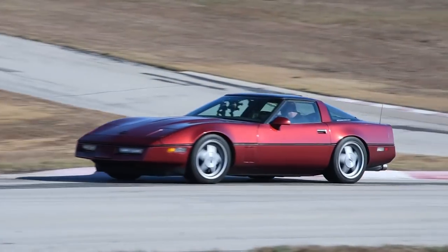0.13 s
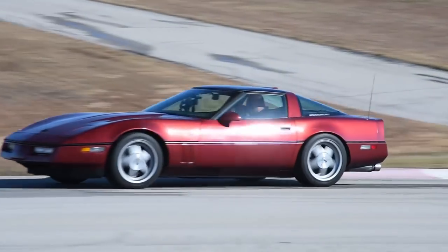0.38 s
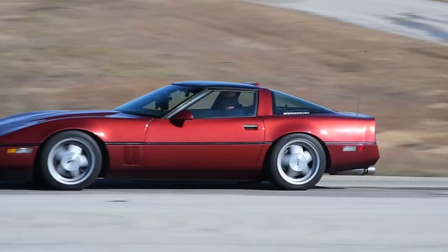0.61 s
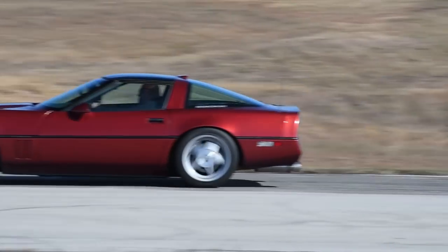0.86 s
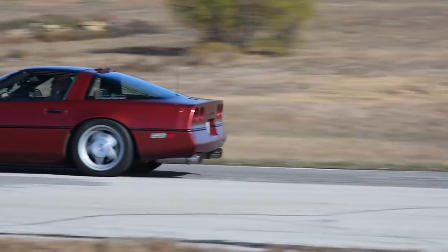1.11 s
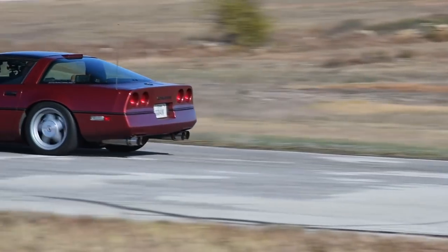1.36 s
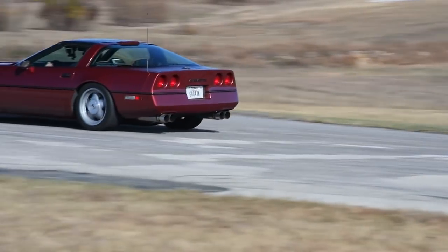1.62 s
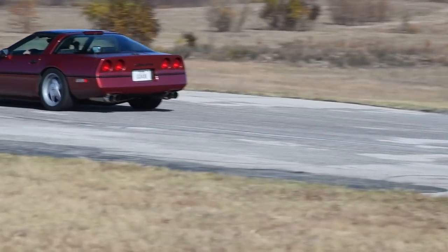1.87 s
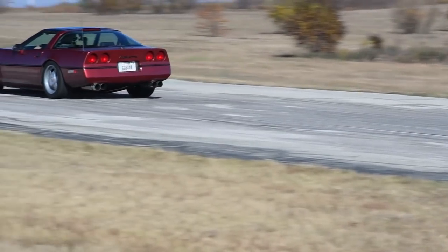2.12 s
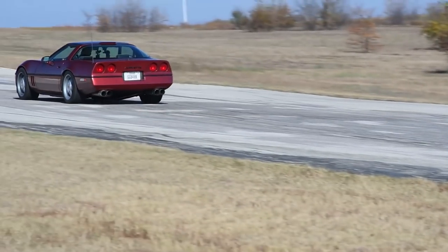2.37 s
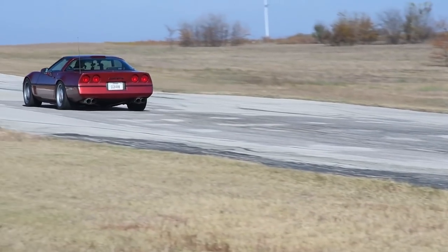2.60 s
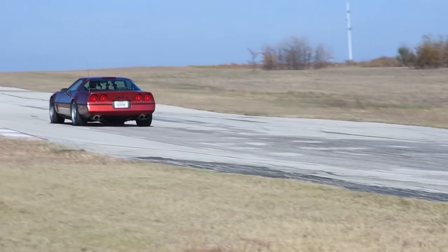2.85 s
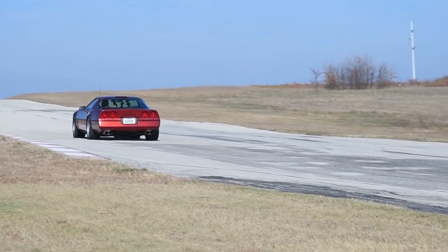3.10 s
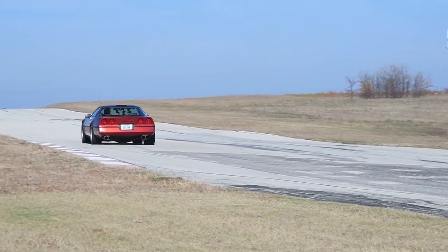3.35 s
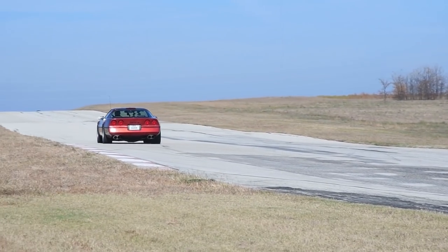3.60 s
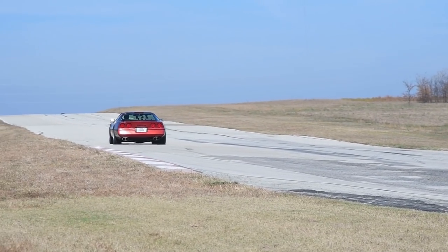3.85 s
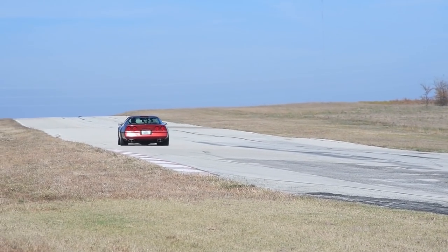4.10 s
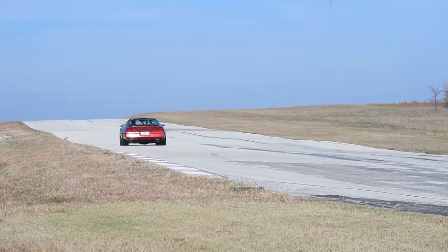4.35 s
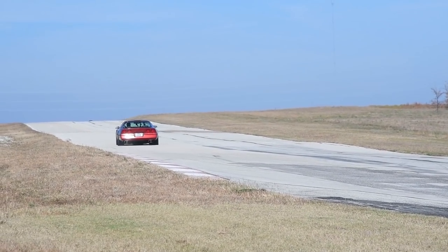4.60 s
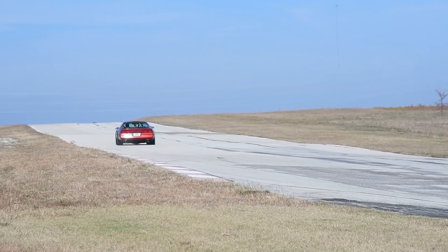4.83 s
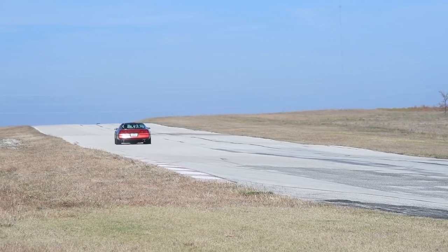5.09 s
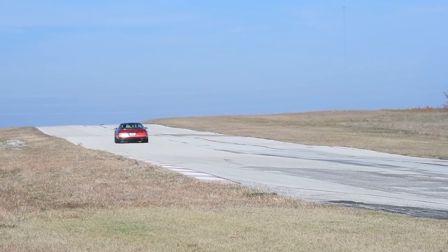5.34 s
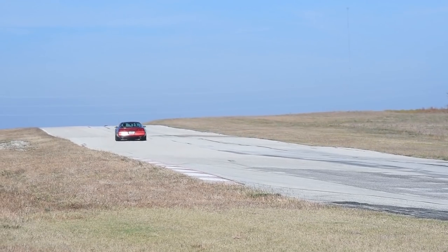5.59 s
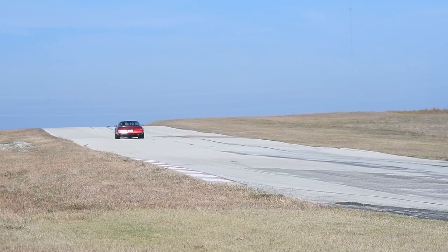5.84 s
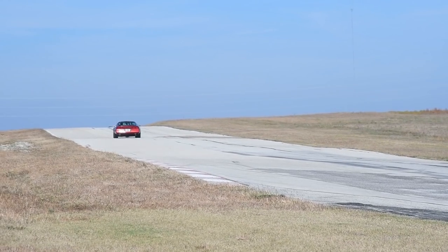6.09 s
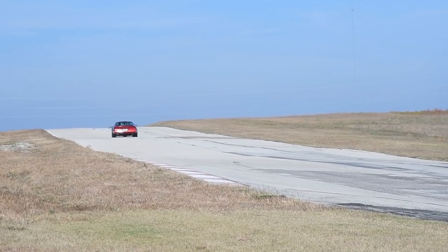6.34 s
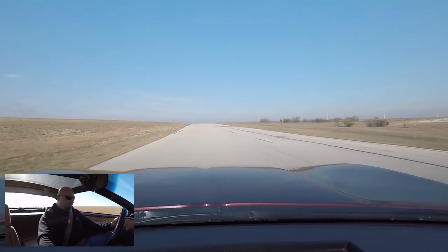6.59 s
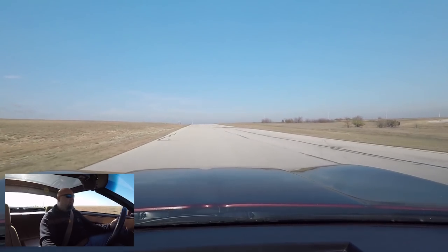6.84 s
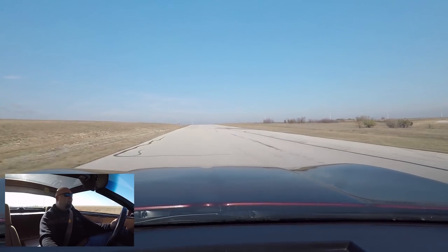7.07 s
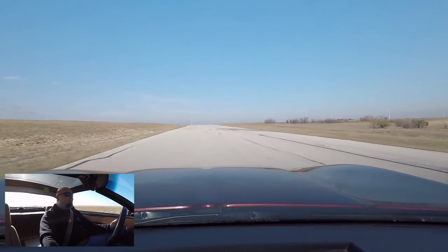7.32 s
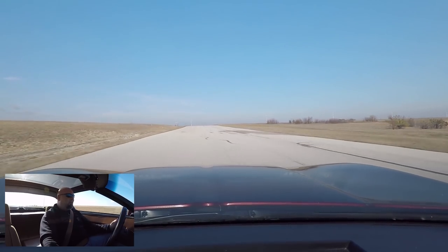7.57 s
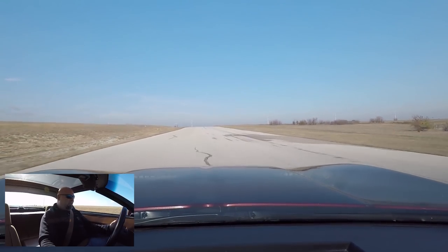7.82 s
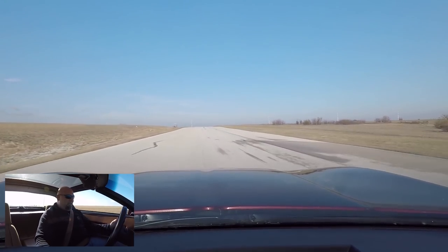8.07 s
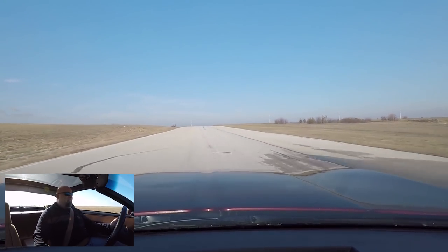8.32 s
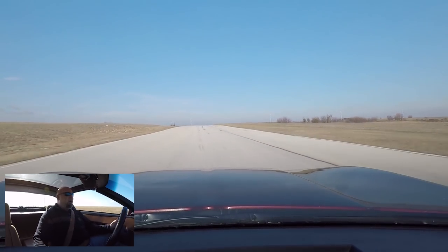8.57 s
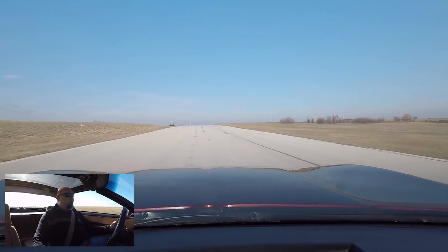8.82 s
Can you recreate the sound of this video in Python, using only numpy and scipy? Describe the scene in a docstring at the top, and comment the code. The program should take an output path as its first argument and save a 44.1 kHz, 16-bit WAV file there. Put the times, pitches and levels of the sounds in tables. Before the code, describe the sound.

From the first instant to 0.5 s, three back-to-back tyre squeals, raspy tones around 1.1 to 1.2 kHz, ride over broad roar at a trackside mono microphone. From 0.6 s the car sweeps close: gritty tyre and exhaust roar, air hiss, faint crackle and a breathy turbo whistle rising until about 2.5 s. The V8 growl dips slightly, then swells strongly by 2.3 s and climbs in pitch, overloaded and rough, with wheelspin flares near 4.85 and 5.2 s. Stereo cabin boom and rumble creep in underneath from about 2.2 s. The trackside sound fades out between 5.6 and 6.5 s, leaving the cabin engine rising with wind rush and a tick at 6.8 s. At 7.85 s the throttle lifts; fluttering blow-off chirps fall, revs sink, rattles click, clustering at 8.3 s. Around 8.6 s revs jump up with intake hiss and the next gear pulls until 8.9 s.

```python
"""Squealing bend and gear change

A turbocharged V8 squeals its tyres through a bend and pulls away, heard by an overloaded mono trackside
microphone. Under it a stereo microphone in the cabin fades in: the same kind of engine climbs through a
gear, the driver lifts, the turbo blows off, the lever rattles and the next gear takes up. Engines are sines
locked to the crank, roar and wind are bands of noise, whistles are fluttering sines, rattles are ringing ticks."""
import sys
import numpy as np
from scipy import signal
from scipy.io import wavfile

SR = 44100
rng = np.random.default_rng(int(sys.argv[2]) if len(sys.argv) > 2 else 0)


def to_wav(sig):
    """Store sig (one row per channel, or 1-D mono) as 16-bit WAV at the path in sys.argv[1].

    Samples outside -1..1 are clipped; the rate is SR.
    """
    pcm = np.clip(np.atleast_2d(sig), -1, 1) * 32767
    pcm = np.round(pcm).astype(np.int16)
    wavfile.write(sys.argv[1], SR, pcm.T)  # frames by channels


def volts(x):
    """Linear amplitude factor 10**(x/20) for a level x in dB, scalar or array-like."""
    e = np.asarray(x, float) / 20
    return 10 ** e


N = 394254   # length of the scene in samples
SIDE = np.array([[.5], [-.5]])   # shares a left-right difference between the two channels


def rms_one(x):
    """Scale to unit rms."""
    return x / np.sqrt(np.mean(x ** 2) + 1e-20)


def in_time(rows):
    """A mask that is silent outside the table, then the table's columns drawn out to every sample."""
    s, *columns = np.transpose(rows)
    t = np.arange(N) / SR
    inside = (t >= s[0] - .002) & (t <= s[-1] + .002)
    return [inside] + [np.interp(t, s, c) for c in columns]


def at_hz(points, hz):
    """Read a table of frequencies on a log axis."""
    table_hz, values = np.transpose(points)
    return np.interp(np.log(hz), np.log(table_hz), values)


def drift(rate_hz):
    """Slow chance of rms 1: noise at every 20th sample, smoothed twice by a one-pole filter."""
    r = np.exp(-40 * np.pi * rate_hz / SR)
    noise = rng.standard_normal(N // 20 + 2002)
    slow = signal.lfilter([1], [1, -2 * r, r * r], noise)[2000:]   # drops the filter's start
    return np.interp(np.arange(N) / 20, np.arange(len(slow)), rms_one(slow))


def bump(centre_s, half_s):
    """A smooth rise and fall of height 1 about a moment."""
    return np.cos(np.pi / 2 * np.clip((np.arange(N) / SR - centre_s) / half_s, -1, 1)) ** 2


# how alike the cabin noise is at the two ears: (frequency [Hz], likeness [-1 to 1])
CABIN_LIKENESS = [(60, 0.84), (150, 0.64), (380, 0.98), (950, 0.7), (2380, 0.88), (5980, -0.29),
                  (15000, -0.44)]


def banded_noise(colour, patchy_db, stereo=False, octaves=0.5005):
    """Narrow bands of noise, each with its own level and flicker; about rms 1 before the flicker."""
    lowest, highest = colour[0][0], colour[-1][0]
    edges = lowest * 2 ** np.arange(0, np.log2(highest / lowest) + .2, octaves)
    white = rng.standard_normal((2, 1 + stereo, N))   # neighbouring bands use different noise
    together = drift(14.6)
    out, power = 0, 0
    for k, (low, high) in enumerate(zip(edges, np.minimum(edges[1:], .45 * SR))):
        hz = np.sqrt(low * high)
        band_filter = signal.butter(2, [low, high], "band", fs=SR, output="sos")
        band = signal.sosfilt(band_filter, white[k % 2])
        if stereo:
            alike = np.clip(at_hz(CABIN_LIKENESS, hz), -1, 1)
            middle = np.sqrt(1 + alike) * band[0]
            apart = np.sqrt(1 - alike) * band[1] * [[1], [-1]]
            band = (middle + apart) / np.sqrt(2)
        level = volts(at_hz(colour, hz))
        power += level ** 2 * (high - low) * 2 / SR
        flicker = volts(patchy_db * (0.52 * together + drift(10.4)))
        out = out + level * flicker * band
    return out / np.sqrt(power)


def wheelspin(flares):
    """Extra turns per second as the driven wheels briefly spin."""
    return sum(extra * bump(s, half_s) for s, half_s, extra in flares)


def crank_angle(turns_per_s, wander):
    """Crank angle in radians, with a slight unevenness of speed."""
    return 2 * np.pi * np.cumsum(turns_per_s * (1 + wander * drift(19.0))) / SR


def order(angle, multiple, db, waver_db, lead=0):
    """One engine order: a sine at a multiple of crank speed, its rms wavering about a level."""
    start = rng.uniform(0, 2 * np.pi)
    return np.sqrt(2) * volts(db + waver_db * drift(4.4)) * np.sin(multiple * angle + start + lead)


def whistle(gain, hz, spread_hz, overtone_db, steady=0):
    """A breathy tone: a sine whose strength and sign flutter about a steady part, with an octave above."""
    angle = 2 * np.pi * np.cumsum(hz) / SR
    tone = (steady + drift(spread_hz)) * np.sin(angle)
    octave = volts(overtone_db) * drift(3 * spread_hz) * np.sin(2 * angle)
    return np.sqrt(2 / (1 + steady ** 2)) * gain * (tone + octave)


def turbo(rows, spread_hz):
    """The whine of the compressor wheel: a fluttering tone that follows a table of pitch and level."""
    on, hz, db = in_time(rows)
    return whistle(on * volts(db), hz, spread_hz, overtone_db=-60)


# road, wind and engine-load noise in the cabin, before the fade-in:
# (time [s], rumble level [dB], wind rush level [dB], load drumming level [dB])
CABIN_NOISE = [(2.55, -22, -53.5, -46), (3.5, -22, -46.5, -36.5), (4.5, -21.5, -44.5, -39),
               (5.5, -15.5, -44.5, -51), (6.3, -16.5, -32.5, -28), (7, -13.5, -29.5, -27.5),
               (7.5, -14, -28, -25), (7.9, -12, -28, -31.5), (8.4, -12, -30, -30),
               (8.94, -10.5, -30.5, -29)]
# colours of road rumble, wind rush and the shell drumming under engine load:
# (frequency [Hz], relative level per Hz [dB])
RUMBLE_COLOUR = [(12, -8.5), (20, 10.5), (65, 0.5), (124, -1), (142, -13), (161, -5), (204, -8.5),
                 (320, -18.5), (420, -67.5), (700, -120)]
RUSH_COLOUR = [(280, -9), (400, -14.5), (700, -11.5), (1000, -13), (1500, -19.5), (1900, -18),
               (2500, -21.5), (3000, -37), (3500, -34.5), (4300, -39), (6000, -40.5), (11000, -41.5),
               (15500, -51.5), (19000, -50)]
LOAD_COLOUR = [(160, -18.5), (280, 7), (387, -31), (418, -3.5), (534, -6), (703, -10), (826, -34),
               (1030, -24.5), (1500, -35.5), (1950, -57.5), (3300, -120)]
# intake hiss as the throttle snaps open again, before the fade-in: (time [s], level [dB])
INTAKE = [(8.615, -60), (8.635, -35), (8.72, -29), (8.79, -30), (8.85, -32), (8.94, -34)]
# colour of the intake hiss: (frequency [Hz], relative level per Hz [dB])
HISS_COLOUR = [(650, 0), (820, 20), (1050, 20), (1500, 18), (1800, 2), (2550, 7), (2900, 1), (3300, 9),
               (4200, -6), (5500, -15), (6600, -5), (7400, -11), (8300, -3), (10000, -3), (11000, -16),
               (15500, -24)]
CABIN_BALANCE_DB = -0.6   # left over right


def cabin_noise():
    """Road rumble, wind rush, load drumming and intake hiss: four coloured stereo noises."""
    rumble_db, rush_db, load_db = in_time(CABIN_NOISE)[1:]
    opened, hiss_db = in_time(INTAKE)
    noise = volts(rumble_db) * banded_noise(RUMBLE_COLOUR, 0.5, stereo=True)
    noise += volts(rush_db) * banded_noise(RUSH_COLOUR, 1.4, stereo=True, octaves=1 / 3)
    noise += volts(load_db) * banded_noise(LOAD_COLOUR, 2.0, stereo=True, octaves=1 / 4)
    noise += opened * volts(hiss_db) * banded_noise(HISS_COLOUR, 3, stereo=True, octaves=1 / 6)
    return volts(CABIN_BALANCE_DB * SIDE) * noise


# rattles of lever and trim: (time [s], relative strength [dB], left over right [dB])
RATTLES = [(6.8156, -38, 9), (7.7927, -42.5, -0.5), (7.9187, -41, -1), (7.968, -41, 7), (8.0725, -44, 10),
           (8.1633, -56, 1), (8.302, -39, 1.5), (8.3084, -33.5, 11.5), (8.326, -29.5, 3.5),
           (8.3427, -37, 7)]
# ringing of the rattling parts: (frequency [Hz], relative strength [dB], time to fall by 60 dB [s])
RATTLE_MODES = [(6500, -9, 0.052), (8260, 1, 0.054), (10000, 1.5, 0.05), (10940, 3, 0.036),
                (12200, -3, .06), (13600, -5, .04), (15050, -7, .09)]


def rattles():
    """Each rattle is a cluster of three ticks: a broad snap of dying noise and a faint ring of the modes."""
    s, strength_db, pan_db = np.transpose(RATTLES)
    gaps_s = rng.uniform(0, 0.0022, (len(s), 3))
    ticks = np.round((s[:, None] + np.cumsum(gaps_s, axis=1)) * SR).astype(int)
    place = volts(strength_db[:, None] + np.multiply.outer([.5, -.5], pan_db[:, None]))
    blows = np.zeros((2, N))
    blows[:, ticks] = place
    dying = signal.lfilter([1], [1, -volts(-60 / (.04 * SR))], blows + 1e-18)   # falls 60 dB in 0.04 s
    snap = signal.butter(4, 5500, "high", fs=SR, output="sos")
    out = volts(-12.0) * signal.sosfilt(snap, dying * rng.standard_normal((2, N)))
    for hz, db, t60_s in RATTLE_MODES:
        clicks = np.zeros((2, N))
        clicks[:, ticks] = place * volts(db - 23 + 5.0 * rng.standard_normal(ticks.shape))
        r = volts(-60 / (t60_s * SR))
        w = 2 * np.pi * hz / SR
        out += signal.lfilter([0, np.sin(w)], [1, -2 * r * np.cos(w), r * r], clicks + 1e-18)
    return out


# the valve flutters shut in falling chirps: (centre time [s], pitch [Hz], level [dB])
BLOW_OFF = [(7.866, 1420, -31), (7.902, 1200, -29), (7.985, 1000, -37)]
CHIRP_HALF_S, CHIRP_SAG_HZ_PER_S = .024, 2500


def blow_off():
    """The turbo's valve flutters shut: each chirp swells, sags in pitch and dies."""
    t = np.arange(N) / SR
    out = np.zeros(N)
    for s, hz, db in BLOW_OFF:
        falling_hz = hz - CHIRP_SAG_HZ_PER_S * np.clip(t - s, -.1, .1)
        gain = volts(db) * bump(s, CHIRP_HALF_S)
        out += whistle(gain, falling_hz, spread_hz=30.0, overtone_db=-2, steady=2.5)
    return out


# turbo whine in the cabin: (time [s], pitch [Hz], level [dB])
CABIN_TURBO = [(6.25, 10100, -80), (6.6, 10800, -69), (6.85, 11135, -65), (7.2, 11480, -64),
               (7.75, 11720, -61), (7.82, 11750, -75)]


def cabin_turbo():
    """The compressor whine, fluttering separately at left and right."""
    return np.array([turbo(CABIN_TURBO, spread_hz=110.0) for channel in range(2)])


# steady crank speed through one gear, the lift and the next gear: (time [s], speed [turns/s])
CABIN_SPEED = [(2.15, 35.5), (3.05, 38.5), (4.5, 44.3), (5.3, 49.1), (6.1, 54.8), (6.5, 58), (6.8, 61),
               (7.1, 63.6), (7.84, 68.6), (8.05, 56.5), (8.25, 48), (8.45, 40.5), (8.6, 37.5), (8.75, 49.6),
               (8.94, 50.3)]
# flares of wheelspin: (centre time [s], half length [s], extra speed [turns/s])
CABIN_SPIN = [(6.715, .09, 3.8)]
# boom in the shell at full throttle, before the fade-in: (crank speed [turns/s], order 1 [dB],
# order 2 [dB], order 3 [dB], firing order 4 [dB], other orders [dB])
CABIN_ENGINE = [(36.7, -36, -27, -36, -22.5, -34), (45, -22.5, -23, -31.5, -19, -30),
                (51.1, -30.5, -25, -37, -14.5, -34), (55.3, -33, -20.5, -31.5, -25.5, -24.5),
                (56, -25, -17, -29, -30, -32), (62, -19.5, -23, -22.5, -20.5, -28),
                (65.3, -16, -19, -23, -20.5, -29), (65.7, -15.5, -15.5, -20.5, -27, -25),
                (69.4, -18.5, -29, -22.5, -30.5, -29.5)]
# how far the throttle is open: (time [s], opening [0 to 1])
THROTTLE = [(7.84, 1), (7.91, 0), (8.58, 0), (8.68, 1)]
# change on a closed throttle, for orders 1, 2, 3, 4 and the others: level change [dB]
LIFT_DB = (-2, -8, 1, -4, -10)
# how orders 1 to 4 reach the two cabin ports: (left over right [dB], left leads by [rad])
CABIN_PORTS = [(-0.5, .3), (-3.5, 0.24), (-6.5, 1.44), (-3.5, 0.7)]
# remaining orders: (multiple of crank speed, level relative to the "other orders" column [dB])
CABIN_ORDERS = [(.5, -5.5), (1.5, 0.0), (2.5, -2), (3.5, -3), (4.5, -5), (5, -9), (6, -12), (6.5, -7),
                (7, -14), (8, -7), (9, -16), (10.5, -10), (12, -16), (16, -14)]


def cabin_engine():
    """Engine orders boom in the shell, each strongest at its own speeds, and change as the throttle shuts."""
    speed = in_time(CABIN_SPEED)[1] + wheelspin(CABIN_SPIN)
    closed = 1 - in_time(THROTTLE)[1]
    turns, *columns = np.transpose(CABIN_ENGINE)
    *main_db, others_db = [np.interp(speed, turns, c) + closed * lift for c, lift in zip(columns, LIFT_DB)]
    angle = crank_angle(speed, wander=0.0034)
    engine = np.zeros((2, N))
    for k, (db, (pan_db, lead)) in enumerate(zip(main_db, CABIN_PORTS)):
        engine += order(angle, k + 1, db + pan_db * SIDE, 1.43, lead * SIDE)
    for k, db in CABIN_ORDERS:
        lead = 0.89 * SIDE * (-1) ** int(k)   # left leads or lags by the order's whole part, even or odd
        engine += order(angle, k, others_db + db, 2.5, lead)
    return engine


# the cabin's engine and noise are faded in: (time [s], level [dB])
CABIN_FADE = [(2.15, -25), (2.4, -12), (2.7, 1), (8.94, -3.5)]


def cabin():
    """The stereo cabin: engine and noise under a fade, with turbo, blow-off and rattles on top."""
    on, fade_db = in_time(CABIN_FADE)
    faded = on * volts(fade_db) * (cabin_engine() + cabin_noise())
    return faded + cabin_turbo() + blow_off() + rattles()


# hiss of the air round the body: (frequency [Hz], relative level per Hz [dB])
AIR_COLOUR = [(3500, 7.5), (5000, 3), (7000, -7.5), (10000, -9.5), (15500, -16.5)]
AIR_DB, NEAREST_S, AIR_FADES_DB_PER_S = -39.5, 1.58, 4


def passing_air():
    """Air hisses round the body, fading once the car has gone by."""
    air_db = AIR_DB - AIR_FADES_DB_PER_S * np.maximum(np.arange(N) / SR - NEAREST_S, 0)
    return volts(air_db) * banded_noise(AIR_COLOUR, 0.7)[0]


def crackle(per_s):
    """Crackle of an overloaded microphone: thin ticks in loose clumps, each well under 1 ms; rms 1."""
    born = rng.random(N) < per_s * volts(3.0 * drift(5.0)) / SR
    sizes = volts(2.2 * np.minimum(rng.exponential(1, N), 3)) * rng.choice([-1, 1], N)
    ticks = signal.lfilter([1, .2], [1, -.9, .2], born * sizes + 1e-18)
    return rms_one(signal.sosfilt(signal.butter(2, 4000, "high", fs=SR, output="sos"), ticks))


# tyre and exhaust roar and boom, with the thin crackle of the overloaded microphone, before rounding:
# (time [s], near roar level [dB], boom level [dB], far roar level [dB], crackle level [dB])
ROAR = [(0, -15, -41.5, -43, -60), (.5, -15, -37, -39, -61), (.8, -14, -17.5, -37, -51),
        (1.4, -16.5, -19.5, -33, -46.5), (1.9, -18.5, -20.5, -25, -61.5), (2.7, -26.5, -24.5, -21, -62.5),
        (3.65, -31, -21, -22.5, -59.5), (4.1, -29, -22.5, -16.5, -52.5), (4.6, -38, -16, -13.5, -53),
        (5.2, -45, -20, -13, -51), (5.7, -52, -24, -12.5, -55.5), (6.5, -45, -27, -17.5, -59)]
# colours of near roar, far roar and boom: (frequency [Hz], relative level per Hz [dB])
ROAR_COLOUR = [(180, -29), (300, -4), (404, -7), (631, 4), (696, -5), (794, 5), (907, -2.5), (1000, 1.5),
               (5570, -25.5), (6460, -29.5), (15500, -64)]
FAR_COLOUR = [(220, -24.5), (380, -10), (428, -1), (536, -5.5), (672, 3.5), (1080, 0), (2490, -19),
              (3200, -28), (5000, -41.5), (6000, -49), (9000, -61), (15500, -71.5)]
BOOM_COLOUR = [(25, -30), (50, -6.5), (90, -9.5), (200, 7.5), (350, 3), (550, -3)]
SPIN_ROAR_DB_PER_TURN = 0.24   # spinning wheels raise the far roar, per extra turn a second


def roar_and_crackle(angle, spin):
    """Tyre and exhaust roar throbbing at the firing rate, low boom, and the overloaded microphone's crackle."""
    heard, near_db, boom_db, far_db, crackle_db = in_time(ROAR)
    near = volts(near_db) * banded_noise(ROAR_COLOUR, 1.6)[0]
    far = volts(far_db + SPIN_ROAR_DB_PER_TURN * spin) * banded_noise(FAR_COLOUR, 1.27, octaves=1 / 3)[0]
    throbbing = (near + far) * (1 + 0.055 * np.sin(4 * angle))
    boom = volts(boom_db) * banded_noise(BOOM_COLOUR, 1.2)[0]
    return heard * (throbbing + boom + volts(crackle_db) * crackle(per_s=80.0))


# turbo whine of the passing car, before the overload: (time [s], pitch [Hz], level [dB])
PASSING_TURBO = [(.6, 5800, -54), (.8, 6050, -44.5), (1.2, 6500, -40), (1.6, 7200, -43), (2, 8760, -52),
                 (2.4, 10200, -59.5), (2.8, 12300, -72), (3.05, 13500, -73.5)]


def passing_turbo():
    """The compressor whine of the passing car, climbing in pitch."""
    return turbo(PASSING_TURBO, spread_hz=300.0)


# the tyres let go three times: (start time [s], length [s], starting stick-slip rate [Hz], level [dB])
SQUEAL = [(.012, .143, 1147, -11.5), (0.156, .228, 1088, -10.5), (0.391, .115, 1142, -10)]
SQUEAL_RISE_HZ_PER_S, SQUEAL_EDGE_S = 560, 0.0056
SQUEAL_DROP_HZ, SQUEAL_DROP_S = 175, .045   # the pitch sags as the grip returns


def slides():
    """Gain and stick-slip rate of the tyres: the rate climbs through each slide, then sags."""
    t, gain, hz = np.arange(N) / SR, np.zeros(N), np.zeros(N)
    for s, length, start_hz, db in SQUEAL:
        since, left = t - s, s + length - t
        gain += volts(db) * np.clip(np.minimum(since, left) / SQUEAL_EDGE_S, 0, 1)
        sag_hz = SQUEAL_DROP_HZ * np.clip(1 - left / SQUEAL_DROP_S, 0, 1)
        rate = start_hz + SQUEAL_RISE_HZ_PER_S * since - sag_hz
        hz = np.where((since >= 0) & (left >= 0), rate, hz)
    return gain, hz


def squeal():
    """The tread sticks and slips: a jittering tone, a weaker one from a second tyre, and broken high tones."""
    gain, hz = slides()
    jitter = 1 + .04 * drift(120.0) + .015 * drift(20.0)
    angle = 2 * np.pi * np.cumsum(hz * jitter) / SR
    second_tyre = volts(-9.5 + 3.5 * drift(25.0)) * drift(60.0) * np.sin(1.24 * angle)
    octave = (.5 + drift(120.0)) * np.sin(2 * angle)
    above_octave = .6 * drift(200.0) * np.sin(2.3 * angle)
    high = volts(-10.5 + 2.5 * drift(25.0)) * (octave + above_octave)
    waver = volts(np.minimum(2.5 * drift(70.0), 2))
    return gain * np.sqrt(2) * waver * (np.sin(angle) + second_tyre + high)


# steady crank speed of the passing car: (time [s], speed [turns/s])
PASSING_SPEED = [(0, 42.9), (.9, 41.4), (1.5, 40.6), (1.9, 41.5), (2.3, 42.8), (2.85, 45.1), (3.25, 47.7),
                 (3.7, 50.9), (4.5, 58.1), (5.03, 61.9), (5.5, 65.6), (6.5, 71.8)]
# flares of wheelspin: (centre time [s], half length [s], extra speed [turns/s])
PASSING_SPIN = [(4.852, .18, 9.4), (5.185, .14, 3.3)]


def passing_crank():
    """Crank angle of the passing car, and the extra turns per second of its wheelspin."""
    spin = wheelspin(PASSING_SPIN)
    return crank_angle(in_time(PASSING_SPEED)[1] + spin, wander=0.003), spin


# exhaust note before the overload:
# (time [s], firing order 4 level [dB], order 5 level [dB], other orders level [dB])
PASSING = [(0, -21, -25, -33), (.45, -15.5, -33, -33), (.67, -33, -26, -30), (.88, -23, -27, -29),
           (1.28, -20, -33, -31), (1.55, -16.5, -31, -30.5), (2.3, -6, -21.5, -29.5), (2.85, -8, -24, -26),
           (3.65, -9.5, -22, -26), (4.1, -15.5, -19, -25), (4.7, -14, -17, -28), (5.3, -16, -23, -30.5),
           (5.85, -18, -24, -29.5), (6.5, -23.5, -33, -41)]
# uneven exhaust pulses of the two banks:
# (multiple of crank speed, level relative to the "other orders" column [dB])
PASSING_ORDERS = [(1, -9), (2, 3), (2.5, 2), (3, -3.5), (3.5, -15), (4.5, 2), (5.5, -6.5), (6, 1.5),
                  (6.5, -8), (7, -5.5), (8, -13.5), (9, -14), (10, -6)]


def passing_engine(angle):
    """The exhaust note: sines at the firing order, order 5 and the orders of the uneven pulses."""
    on, *main_db, others_db = in_time(PASSING)
    engine = sum(order(angle, k, db, waver_db=1.1) for k, db in zip((4, 5), main_db))
    engine += sum(order(angle, k, others_db + db, waver_db=1.8) for k, db in PASSING_ORDERS)
    return on * engine


# the trackside sound is faded out after its overload: (time [s], level [dB])
TRACKSIDE_FADE = [(0, -0.5), (2.2, 0.5), (5.6, -1.5), (6.05, -4), (6.22, -8.5), (6.35, -19.5), (6.5, -29.5)]
TRACKSIDE_TOP = 0.59   # amplitude the overloaded input cannot pass, before the fade


def trackside():
    """The passing car in mono, its peaks rounded by the overloaded input."""
    angle, spin = passing_crank()
    car = passing_air() + roar_and_crackle(angle, spin) + passing_turbo() + squeal() + passing_engine(angle)
    overloaded = car / (1 + (car / TRACKSIDE_TOP) ** 6) ** (1 / 6)
    return overloaded * volts(in_time(TRACKSIDE_FADE)[1])


def scene():
    """The mono trackside sound lies in the middle of the stereo cabin."""
    return cabin() + trackside()


def low_pass(x):
    """Removes everything above the highest recorded frequency."""
    return signal.sosfilt(signal.butter(12, 15710, fs=SR, output="sos"), x)


def record(dry):
    """The mix clips at full scale."""
    mix = np.clip(dry, -1, 1)
    return low_pass(mix)


dry = scene()
out = record(dry)
to_wav(out)
```